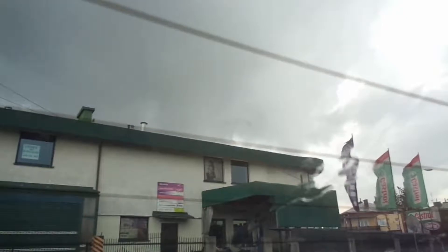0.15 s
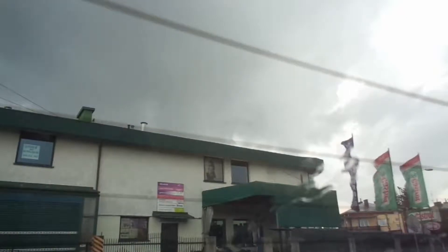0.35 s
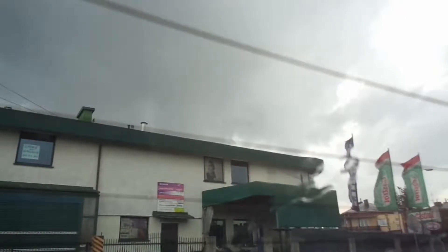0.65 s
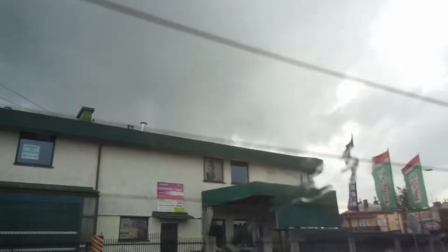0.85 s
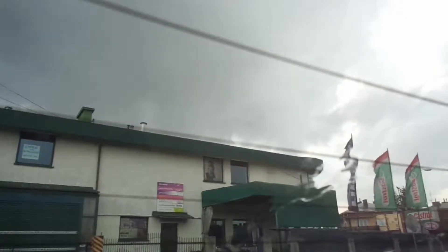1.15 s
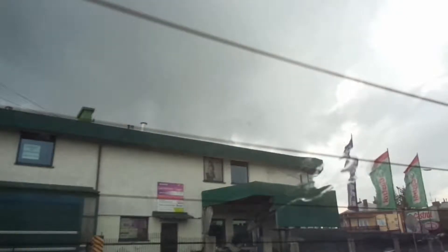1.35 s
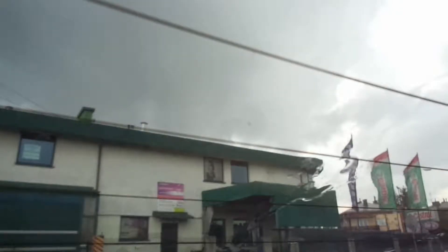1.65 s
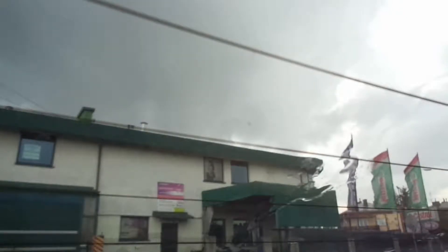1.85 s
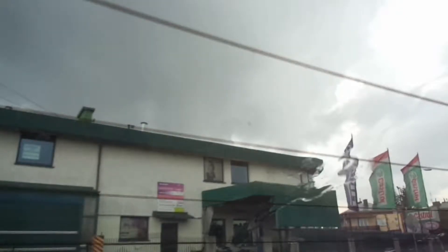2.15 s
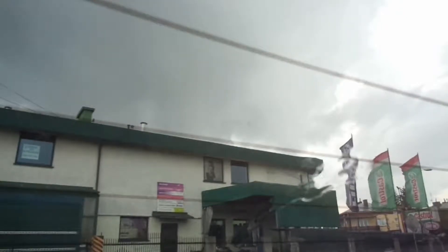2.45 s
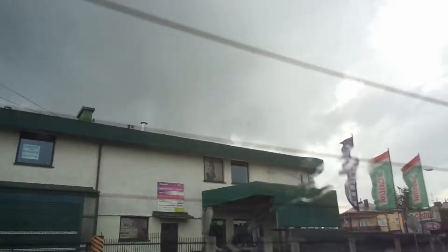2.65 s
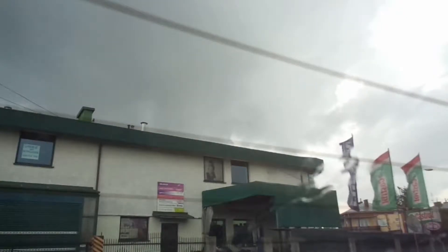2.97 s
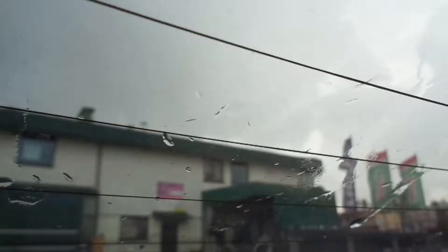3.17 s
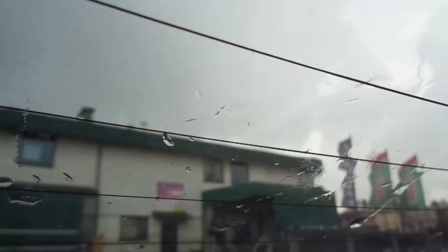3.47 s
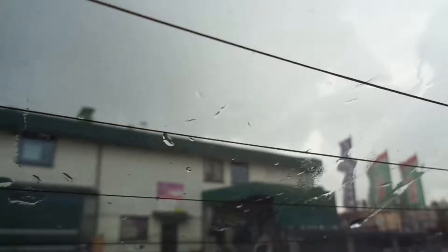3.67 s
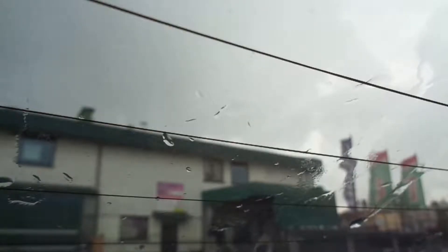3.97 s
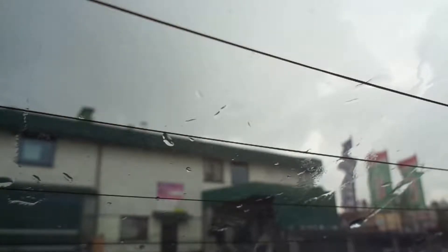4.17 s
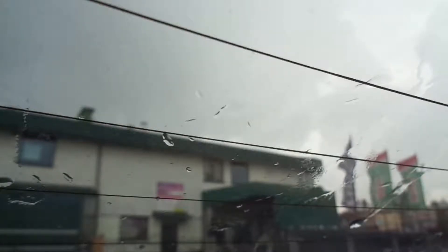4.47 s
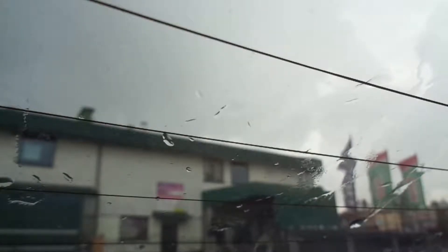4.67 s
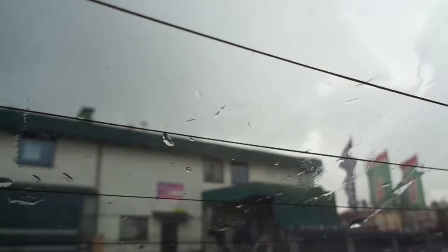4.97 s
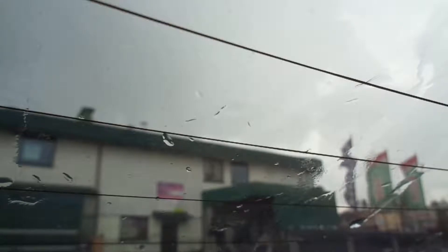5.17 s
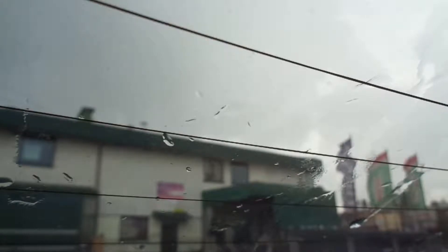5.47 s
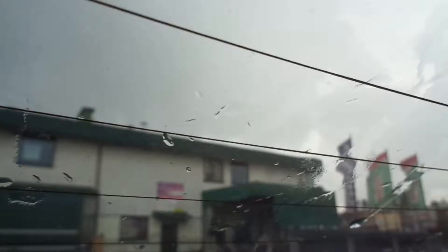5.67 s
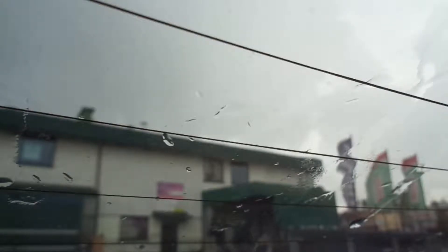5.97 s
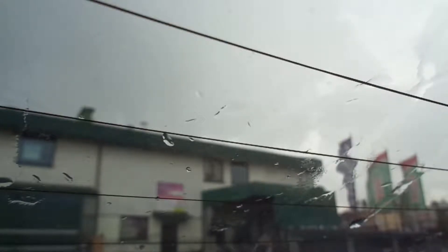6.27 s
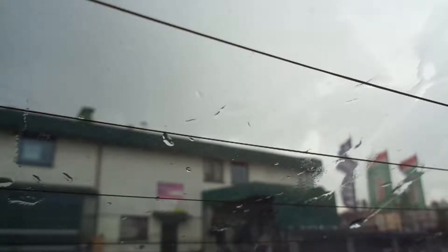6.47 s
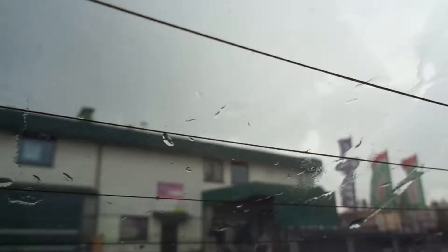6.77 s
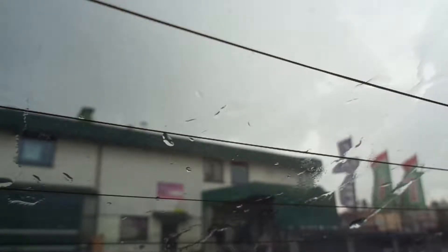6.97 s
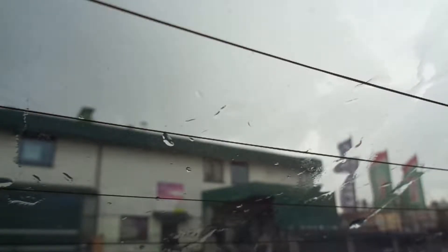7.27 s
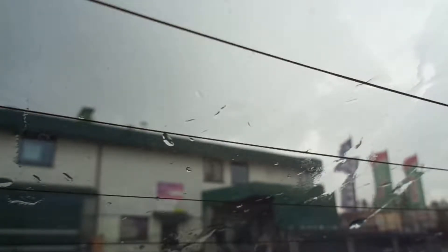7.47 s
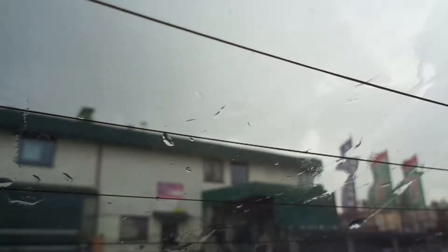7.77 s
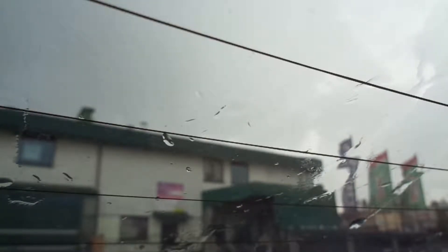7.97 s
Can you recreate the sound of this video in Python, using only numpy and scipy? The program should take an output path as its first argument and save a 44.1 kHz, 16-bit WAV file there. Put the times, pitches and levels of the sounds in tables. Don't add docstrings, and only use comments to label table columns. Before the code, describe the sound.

Close-miked rain on a window during a storm: sparse thuds and knocks, each a quick snap with a short woody, glassy ring and sometimes a low boom. A quiet background of hollow rain wash, low rumble and microphone hiss continues throughout, turning thinner and more sizzling partway. Small ticks fill the gaps; the strongest burst of hits comes near the end, then it thins out to a final sharp pair of taps.

```python
import sys
import numpy as np
from scipy import signal
from scipy.fft import rfft, irfft, next_fast_len
from scipy.io import wavfile
from scipy.ndimage import map_coordinates

SR = 44100
rng = np.random.default_rng(int(sys.argv[2]) if len(sys.argv) > 2 else 0)


def invert_db(level):
    return 10 ** (np.asarray(level, dtype=float) / 20)


def wrap_up_sound(samples):
    columns = np.atleast_2d(samples).T
    tamed = np.clip(columns, -1, 1)
    steps = np.round(tamed * 32767).astype(np.int16)
    wavfile.write(sys.argv[1], SR, steps)


N = 358091
TOP_HZ = 15050


def along(points, hz):
    f, v = np.transpose(points)
    return np.interp(np.log(hz + 1), np.log(f + 1), v)


def unit(x):
    return x / np.sqrt(np.mean(x ** 2) + 1e-20)


def wobble(rate):
    return map_coordinates(rng.standard_normal(int(N * rate / SR) + 4), [np.arange(N) * rate / SR])


def coloured(x, gain):
    m = next_fast_len(len(x) + 8192)
    hz = np.fft.rfftfreq(m, 1 / SR)
    return unit(irfft(rfft(x, m) * gain(hz), m)[:len(x)])


def rush(spectrum, flutter_db, patter_db):
    chance, size = rng.random(N), rng.exponential(size=N)
    landed = chance < 90 / SR
    patter = landed * invert_db(2.7 * np.minimum(size, 3)) * rng.choice([-1, 1], N)
    smear = rng.standard_normal(400) * invert_db(-60 * np.arange(400) / SR / 0.012)
    patter = unit(signal.fftconvolve(patter, smear)[:N])
    mix = rng.standard_normal(N) + invert_db(patter_db) * patter
    mix = coloured(mix, lambda hz: invert_db(along(spectrum, hz)))
    flutter = wobble(6.6) + 0.067 * wobble(2.93)
    return unit(mix * invert_db(flutter_db * flutter))


def background_change(early, late):
    changed = np.clip((np.arange(N) / SR - 2.74) / .2, 0, 1)
    return np.sqrt(1 - changed) * early + np.sqrt(changed) * late


# (frequency [Hz], level [dB per Hz])
GROUND_TONE = [(12, -70), (30, -24), (45, -8), (62, -1), (85, -6), (120, -35), (200, -90)]


def ground(gust_db):
    return invert_db(gust_db + 8.5) * rush(GROUND_TONE, flutter_db=1.5, patter_db=-25)


# (frequency [Hz], level [dB per Hz])
THUNDER_EARLY = [(60, -78), (110, -3), (150, 3), (240, 2), (340, -5), (480, -19), (900, -77)]
# (frequency [Hz], level [dB per Hz])
THUNDER_LATE = [(60, -55.5), (110, -10.5), (150, -6.5), (200, -1.5), (260, -2.5), (340, -8), (480, -10.5),
                (900, -79)]


def thunder(roll_db):
    early = rush(THUNDER_EARLY, flutter_db=0.0, patter_db=-7.5)
    late = rush(THUNDER_LATE, flutter_db=0.6, patter_db=-8)
    return invert_db(roll_db - 1.5) * background_change(early, late)


# (frequency [Hz], level [dB per Hz])
RAIN_EARLY = [(250, -45), (450, 2.5), (750, -8.5), (950, -7), (1100, 1), (1310, 5), (1420, -7),
              (1600, -10.5), (2000, -12.5), (2700, -16), (4000, -54)]
# (frequency [Hz], level [dB per Hz])
RAIN_LATE = [(250, -12), (450, -1.5), (750, -5), (1000, -5), (1170, -4), (1240, -1.5), (1310, 5.5),
             (1400, -4.5), (1550, -8), (2000, -11.5), (2700, -15.5), (4000, -68)]


def far_rain():
    early = rush(RAIN_EARLY, flutter_db=-1.1, patter_db=-22)
    late = rush(RAIN_LATE, flutter_db=-1.94, patter_db=-9)
    return invert_db(-52.5) * background_change(early, late)


# (frequency [Hz], level [dB per Hz])
SPRAY_TONE = [(1800, -30), (2600, -11), (3100, -3), (3700, 0.5), (4300, -6.5), (5200, -13), (8000, -29.5)]


def spray(roll_db):
    gains = 0.49
    level_db = -64.5 - gains * (roll_db - roll_db.mean())
    return invert_db(level_db) * rush(SPRAY_TONE, flutter_db=1.6, patter_db=-6.5)


# (time [s], thunder level [dB], gust level [dB])
WEATHER = [(0, -46, -72), (.4, -44.5, -70), (.8, -42, -68), (1.2, -42.5, -76), (1.55, -47, -74),
           (1.95, -40.5, -80), (2.3, -49, -76), (2.7, -46.5, -80), (2.85, -54, -81), (3.5, -52.5, -78),
           (4.2, -56.5, -76), (5.1, -53.5, -75), (5.5, -53.5, -67.5), (6.12, -55, -70), (6.35, -54.5, -76),
           (7.05, -49, -67), (7.5, -57.5, -76.5), (8.12, -54, -69)]


def storm():
    s, *levels = np.transpose(WEATHER)
    roll_db, gust_db = (np.interp(np.arange(N) / SR, s, db) for db in levels)
    return ground(gust_db) + thunder(roll_db) + far_rain() + spray(roll_db)


# (frequency [Hz], level [dB per Hz])
HISS_TONE = [(300, 5), (2000, 0), (8000, -2), (14000, -2), (20000, -5)]


def hiss():
    noise = rng.standard_normal(N)
    return invert_db(-60) * coloured(noise, lambda hz: invert_db(along(HISS_TONE, hz)) * (hz < TOP_HZ))


def tilt_db(hz, boom_db, bright_db):
    deep = (boom_db + 10) / (1 + (hz / 480) ** 3)
    bright = (bright_db + 10) / (1 + (2600 / (hz + 1)) ** 4)
    return deep + bright


# (frequency [Hz], decay time as a multiple of the drop's own)
RING_SHARE = [(120, 1.5), (260, 2.3), (600, 1.3), (1300, 1), (2200, .75), (4000, .55), (8000, .4),
              (15000, .3)]


def ring_time(hz, t60):
    return t60 * along(RING_SHARE, hz)


# (frequency [Hz], level [dB per Hz])
PLATE_TONE = [(60, -20), (140, -4.5), (250, 5.5), (500, 1), (1100, 2), (1900, 0), (2700, -5.5), (3900, -2),
              (5200, -13), (8000, -20.5), (15000, -29.5)]


def plate_crowd(t, boom_db, bright_db, t60):
    gain = lambda hz: invert_db(along(PLATE_TONE, hz) + tilt_db(hz, boom_db, bright_db)) * (hz < TOP_HZ)
    crowd = coloured(rng.standard_normal(len(t)), gain)
    hz, frames, z = signal.stft(crowd, SR, nperseg=256)
    fade_db = -60 * frames / ring_time(hz, t60)[:, None]
    return signal.istft(z * invert_db(fade_db), SR, nperseg=256)[1][:len(t)]


# (frequency [Hz], level [dB])
PANE_NOTES = [(516, -6.5), (617, 0), (700, -2), (908, -6), (1014, -3.5), (1183, -20), (1310, 0.5),
              (1446, -6), (1535, -4), (1792, -3), (2060, -18)]


def pane_notes(t, boom_db, bright_db, t60):
    hz, db = np.transpose(PANE_NOTES)
    level_db = db + tilt_db(hz, boom_db, bright_db) + rng.normal(0, 3.5, len(hz)) - 11
    fade_db = -60 * t / (1.18 * ring_time(hz, t60))[:, None]
    tones = np.sin(2 * np.pi * hz[:, None] * t)
    return np.sum(invert_db(level_db[:, None] + fade_db) * tones, axis=0)


# (frequency [Hz], level [dB per Hz])
SNAP_TONE = [(100, 12.5), (400, -5), (1300, 6.5), (3800, -8.5), (5500, -14), (9000, -31), (16300, -41),
             (16400, -90)]


def contact_snap(t, rise):
    t = t[:1024]
    burst = coloured(rng.standard_normal(1024), lambda hz: invert_db(along(SNAP_TONE, hz)))
    return burst * invert_db(-60 * t / 0.019) * (1 - np.exp(-t / (rise / 2)))


def drop(boom_db, bright_db, t60, snap_db, rise):
    t = np.arange(int(.6 * SR)) / SR
    ringing = plate_crowd(t, boom_db, bright_db, t60) + pane_notes(t, boom_db, bright_db, t60)
    swell = 1 - np.exp(-t / rise)
    snap = np.pad(contact_snap(t, rise), (0, len(t) - 1024))
    return ringing * swell + invert_db(snap_db + 6.5) * snap


def strike(table, snap_db, rise):
    out = np.zeros(N + SR)
    for s, db, boom_db, bright_db, t60 in table:
        one = invert_db(db - 9.5) * drop(boom_db, bright_db, np.clip(t60, .02, .65), snap_db, rise)
        out[round((s - 1.3 * rise) * SR):][:len(one)] += one
    return out


def notes(table, beat, rise, level_db):
    out = np.zeros(N + SR)
    t = np.arange(int(.8 * SR)) / SR
    for s, db, hz, t60 in table:
        partner_hz = hz * (1 + beat * rng.uniform(0.443, 1.4))
        pair = np.sin(2 * np.pi * hz * t) + 0.47 * np.sin(2 * np.pi * partner_hz * t)
        envelope = invert_db(db + level_db - 60 * t / t60) * (1 - np.exp(-t / rise))
        out[round(s * SR):][:len(t)] += envelope * pair
    return out[:N]


def short_lived(table):
    return [(s, db, hz, 0.084 * (hz / 1000) ** -0.56) for s, db, hz in table]


# (time [s], peak level [dB], boom [dB], brightness [dB], decay time [s])
WATER_SLAPS = [
    (0.066, -24.5, -14, -32, 0.32),
    (5.340, -20, -8, -23, 0.23),
    (6.268, -31, -10, -14, 0.31),
    (6.712, -11.5, -4.5, -21, 0.24),
]


def water_slaps():
    return strike(WATER_SLAPS, snap_db=-30, rise=.009)


# (time [s], peak level [dB], boom [dB], brightness [dB], decay time [s])
NEAR_DROPS = [(0.3002, -26.5, -14, -19.5, 0.27), (2.101, -21.5, -42, -27.5, 0.037),
              (2.64, -21.5, -40, 2, 0.031), (2.641, -16, -16, -51, 0.086), (3.063, -14.5, -12, -28, 0.36),
              (4.89, -30, -11, -15, 0.081), (5.056, -26, -13, -18.5, 0.11), (6.405, -32.5, -24, -5, .1),
              (6.4155, -17, -38, 16, 0.15), (6.591, -25, -24, -4, 0.157), (6.6, -5, -25.5, -24.5, 0.37),
              (6.618, -6.5, -18, -19, 0.19), (6.945, -16, -9, -2.5, 0.068), (6.971, -29.5, -11, -9, 0.1),
              (7.926, -19, -12, -16, 0.16), (7.9607, -14, -4, -21, 0.14)]


def near_drops():
    return strike(NEAR_DROPS, snap_db=-7, rise=0.000756)


# (time [s], peak level [dB], brightness [dB], decay time [s])
SMALL_DROPS = [(0.583, -41, -4, 0.077), (0.648, -44, -7, 0.084), (4.209, -38, -24, 0.29),
               (4.431, -35.5, 1, 0.052), (4.457, -37, -16, 0.078), (5.179, -39.5, -16, 0.18),
               (5.45, -42, -12, 0.088), (5.688, -33.5, -37, 0.054), (5.857, -36.5, -3, 0.089),
               (6.105, -30.5, -17, 0.089), (6.301, -31, -8, 0.073), (6.329, -37, -5, 0.083),
               (7.145, -35, -6, 0.16), (7.208, -41, -13, 0.117), (7.289, -35, -35, 0.047),
               (7.738, -32.5, -20, 0.12), (7.774, -38.5, -17, 0.16)]


def small_drops():
    table = [(s, db, -21, bright_db, t60) for s, db, bright_db, t60 in SMALL_DROPS]
    return strike(table, snap_db=-17, rise=0.000756)


# (time [s], peak level [dB], frequency [Hz])
BRIGHT_PINGS = [
    (0.5836, -49, 3860),
    (0.6504, -48, 2500),
    (3.0604, -39, 2900),
    (3.6424, -34, 3100),
    (5.0579, -46, 3010),
    (6.418, -23, 5800),
    (6.5999, -7, 3740),
    (6.6194, -24, 3440),
    (6.7336, -41, 3570),
    (7.9249, -27, 2770),
]


def pings():
    return notes(short_lived(BRIGHT_PINGS), beat=0.127, rise=0.0003, level_db=-4.5)


# (time [s], peak level [dB], boom [dB], brightness [dB], decay time [s])
FAR_PANEL_DROPS = [(0.741, -15, -11.5, -33, 0.3), (0.857, -41, 1, -4, 0.54), (1.384, -15, -16.5, -20, 0.3),
                   (1.782, -14, -29, -14, 0.23), (1.809, -17.5, -14, -20, 0.35),
                   (2.249, -18.5, -14.5, -25, 0.24), (2.942, -16, -19, -17, 0.29),
                   (3.643, -17.5, -19, -23.5, 0.33), (4.602, -25, -15, -19.5, 0.31),
                   (5.38, -20.5, -7, -30, 0.23), (6.014, -30, 5, -34, 0.16),
                   (6.4208, -8.5, -22.5, -19.5, 0.33), (6.734, -13.5, -8, -13.5, 0.27),
                   (6.825, -23.5, -8, -25, 0.22), (7.455, -29, -25, -19, 0.21)]


def far_drops():
    return strike(FAR_PANEL_DROPS, snap_db=-7, rise=.003)


# (time [s], peak level [dB], frequency [Hz])
BENDING_NOTES = [(0.74, -25, 265), (1.383, -29, 224.4), (1.78, -33, 203), (2.257, -32.5, 256.7),
                 (2.641, -33.5, 253), (2.94, -30.5, 273), (2.944, -29.5, 207), (3.064, -20.5, 270),
                 (3.643, -45, 315), (4.604, -38, 195.4), (5.375, -37, 246), (5.384, -36.5, 111.5),
                 (6.013, -34.5, 398), (6.015, -38, 173), (6.03, -45, 294), (6.419, -28, 197.5),
                 (6.431, -25, 247), (6.599, -19, 250), (6.602, -18.5, 199), (6.734, -36, 262),
                 (6.75, -21.5, 198.7), (6.95, -31, 220), (7.454, -39.5, 211), (7.9595, -19, 308.6),
                 (7.958, -26, 164.5)]


def booms():
    heavy = np.array([row for row in [*NEAR_DROPS, *FAR_PANEL_DROPS] if row[-1] > .125])
    table = []
    for s, db, hz in BENDING_NOTES:
        nearest = np.argmin(abs(heavy[:, 0] - s))
        table.append((s, db, hz, 2.18 * heavy[nearest, -1]))
    return notes(table, beat=0.089, rise=0.0025, level_db=-6.5)


# (time [s], peak level [dB], frequency [Hz])
SPOT_NOTES = [(0.741, -13.5, 625), (.741, -11, 1394), (1.382, -26, 622), (2.099, -24, 1370),
              (2.643, -16.5, 589), (2.643, -15, 436), (2.6425, -15.5, 797), (3.063, -14, 713),
              (5.057, -25, 729), (5.38, -12.5, 735), (6.42, -21, 1310), (6.6, -30, 1044), (6.605, -9, 559),
              (6.6, -3, 2260), (6.6, -1.5, 2860), (6.745, -9.5, 906), (6.943, -16.5, 2180),
              (7.924, -19, 914), (7.9605, -11, 1280), (7.9605, -20, 890)]


def knocks():
    return notes(short_lived(SPOT_NOTES), beat=0.126, rise=0.0011, level_db=-10.0)


# (time [s], peak level [dB], frequency [Hz])
HARD_TAPS = [
    (2.0986, -19.5, 1800),
    (2.6400, -19, 3330),
    (5.0578, -25.5, 1670),
    (6.9438, -10, 2400),
    (7.9599, -1.5, 1040),
]


def taps():
    table = [(s, db, hz, 0.01) for s, db, hz in HARD_TAPS]
    return notes(table, beat=0.26, rise=.0002, level_db=-5.5)


# (time [s], level [dB])
BARE_CLICKS = [
    (3.0615, -22),
    (3.6613, -28),
]


def clicks():
    out = np.zeros(N)
    for s, db in BARE_CLICKS:
        out[round(s * SR)] += invert_db(db)
    return out


def thin_bass(x):
    m = next_fast_len(len(x))
    u = 1j * np.fft.rfftfreq(m, 1 / SR) / 94
    return irfft(rfft(x, m) * u * u / (1 + np.sqrt(2) * u + u * u), m)[:N]


def drops():
    plates = thin_bass(water_slaps() + near_drops() + small_drops() + far_drops())
    return plates + pings() + booms() + knocks() + taps() + clicks()


def scene():
    return (storm() + drops())[None]


# (time [s], recovery time [s], depth [0-1])
SOUND_LOSSES = [
    (1.664, .008, .8),
    (3.6616, .007, .97),
]


def dropouts(x):
    t = np.arange(N) / SR
    for s, recovery, depth in SOUND_LOSSES:
        x = x * (1 - depth * (t > s) * np.exp(-((t - s) / recovery) ** 2))
    return x


def top_cut(x):
    return signal.sosfilt(signal.butter(12, 16340, fs=SR, output="sos"), x)


def record(dry):
    x = dropouts(dry + hiss())
    m = next_fast_len(N + 4096)
    hz = np.fft.rfftfreq(m, 1 / SR)
    bass_cut = hz ** 2 / (hz ** 2 + 45 ** 2)
    treble_cut = np.where(hz < TOP_HZ, 1, invert_db(-13.5)) * (hz < 16300)
    x = irfft(rfft(x, m) * bass_cut * treble_cut, m)[:, :N]
    x = x / (1 + np.abs(x / .7) ** 4) ** (1 / 4)
    return top_cut(x)


dry = scene()
out = record(dry)
wrap_up_sound(out)
```